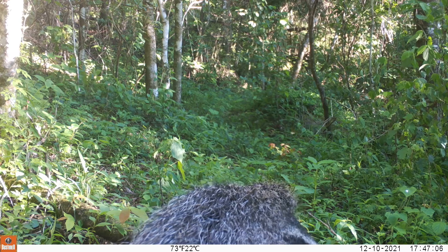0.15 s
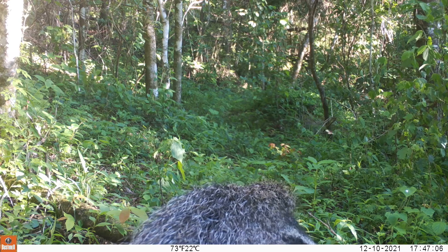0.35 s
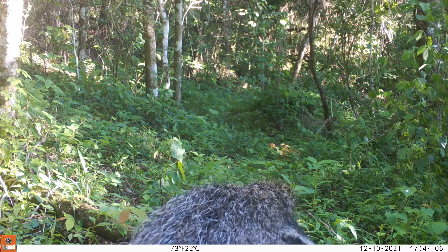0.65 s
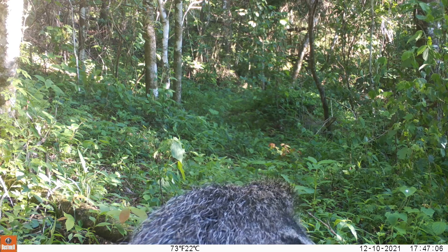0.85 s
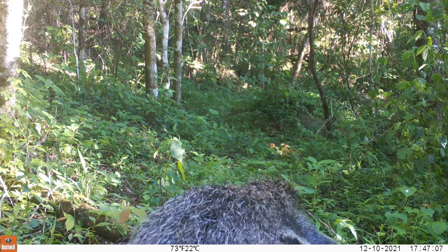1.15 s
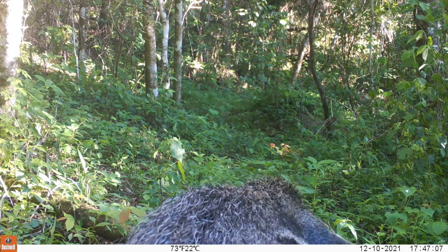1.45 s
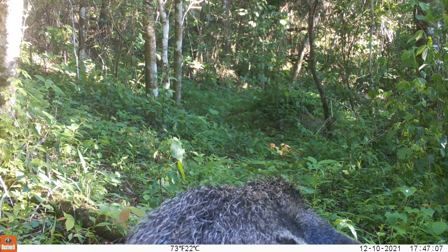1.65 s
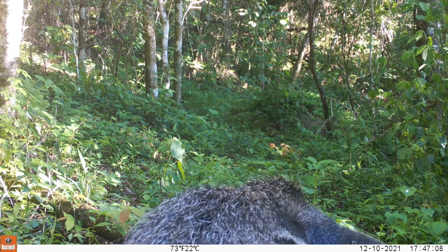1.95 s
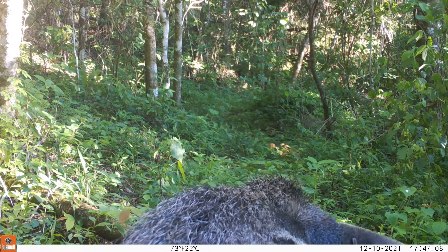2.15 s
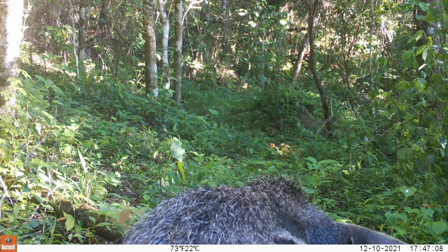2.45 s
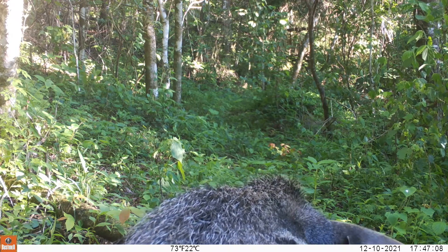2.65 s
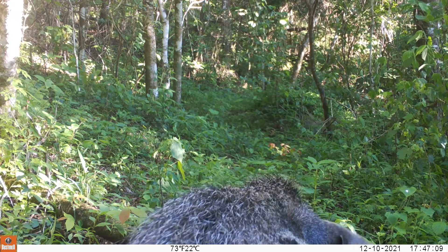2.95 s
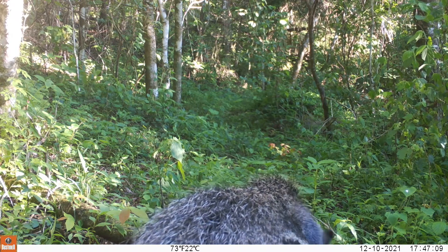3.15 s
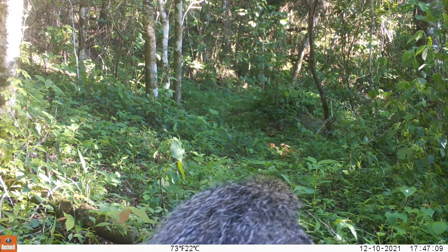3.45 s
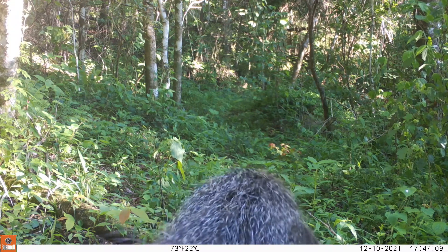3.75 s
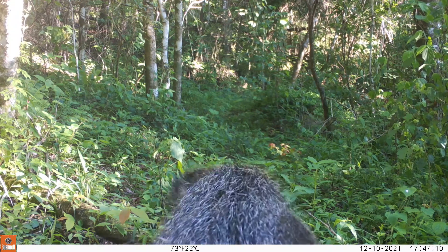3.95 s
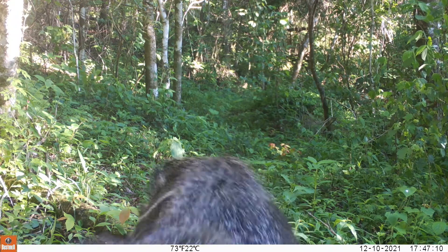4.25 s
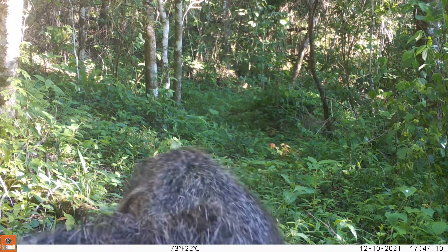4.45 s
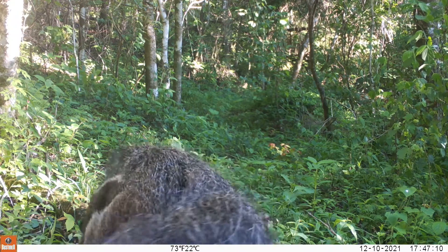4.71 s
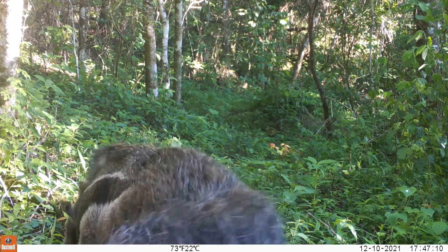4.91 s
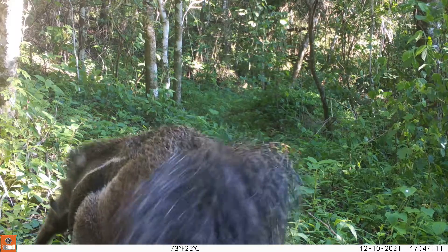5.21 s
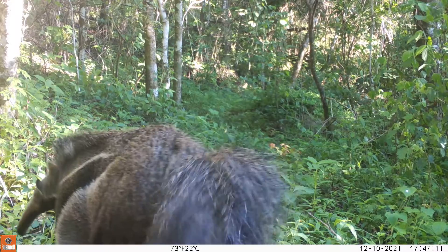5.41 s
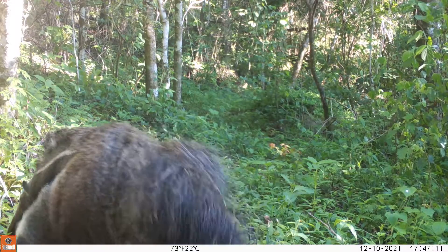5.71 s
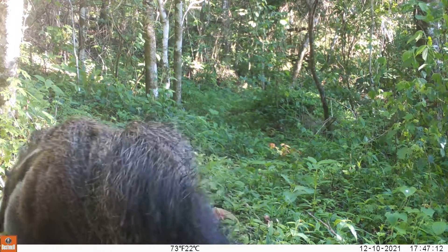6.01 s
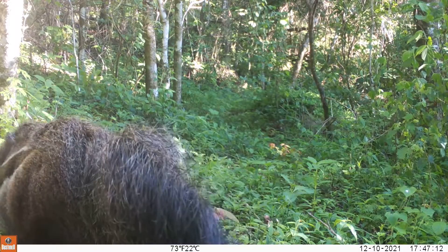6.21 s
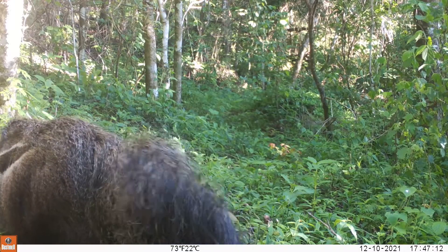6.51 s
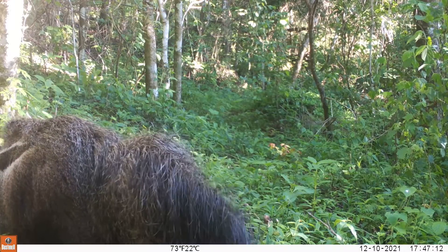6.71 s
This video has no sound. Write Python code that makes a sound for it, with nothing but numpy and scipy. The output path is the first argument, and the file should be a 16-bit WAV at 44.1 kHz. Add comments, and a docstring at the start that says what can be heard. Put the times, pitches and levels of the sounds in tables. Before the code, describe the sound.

Crickets trill throughout in a high, gently swelling whine over soft forest air, faint microphone hiss and a very low hum. A bird gives four short, rising, buzzy chirps with a little echo, at about 0.5, 2.2, 4 and 5.8 seconds. Distant birds whistle faintly now and then, and one gives a brief, quiet rasp at 1 second. A few light twig ticks dot the first three seconds. From about 3.2 seconds an animal pushes through the undergrowth close to the microphone: leaves slide and swish softly along its coarse coat and stems drag, while far insects grow slightly louder. Twigs snap around 3.8 and 4.2 seconds, and the loudest, sharpest crack comes at about 5.3 seconds. More crisp snaps follow in quick, uneven succession until about 6.6 seconds, and the rustling eases near 7 seconds as the crickets carry on.

```python
"""A forest by day, heard through a trail camera's one microphone. From the start, crickets trill
with their wings over soft air, hiss and hum, and now and then a twig ticks. At half a second a bird
sings the first of four rising, buzzy chirps. Far birds whistle faintly, and one rasps at 1 second.
From about 3 seconds a shaggy animal pushes through the undergrowth close by: leaves brush its
coat, stems drag and twigs snap, the loudest just after 5 seconds."""
import sys
import numpy as np
from scipy import signal
from scipy.fft import rfft, irfft
from scipy.io import wavfile

SR = 44100
rng = np.random.default_rng(int(sys.argv[2]) if len(sys.argv) > 2 else 0)


def transcribe(signal):
    """Save signal, clipped to [-1, 1], as a 16-bit WAV file at the path in sys.argv[1]."""
    frames = np.atleast_2d(signal).T
    limited = np.clip(frames, -1, 1)
    pcm = np.round(limited * 32767).astype(np.int16)
    wavfile.write(sys.argv[1], SR, pcm)


N = 302967
TIME = np.arange(N) / SR

# The tone of still air and of the microphone's hiss. Each row: frequency in Hz, relative level in dB.
AIR_SPECTRUM = [(20, 1), (60, -1.5), (100, -1.5), (250, -7.5), (450, -10), (1000, -14.5), (1300, -17),
                (2000, -20.5), (2700, -22), (3300, -19.5), (4000, -19.5), (4900, -13.5), (6300, -14),
                (9000, -60)]
HISS_SPECTRUM = [(3800, -23), (6400, -4), (7000, -3.5), (8400, -7.5), (10400, -5), (11800, -12),
                 (16000, -14)]
# The camera hums at its frame rate and multiples of it. Each row: frequency in Hz, level in dB.
HUM_TONES = [(30, -90), (60, -84), (90, -80.5), (180, -86.5)]
# The crickets in the chorus. Each row: pitch in Hz, wing strokes per second, pitch fall within a
# stroke in Hz, level within the chorus in dB, share of echo from 0 to 1.
CHORUS_CRICKETS = [(5438, 34.2, 404, -4, 0.78), (5628, 37, 301, -.5, 0.88), (5762, 52, 386, -5.5, 0.8),
                   (5930, 44, 444, -12, 0.9)]
# How strongly the chorus sings. Each row: time in seconds, level in dB.
CHORUS_LEVELS = [(0.0, -58), (0.36, -56), (0.69, -58.5), (0.94, -56.5), (1.26, -60), (1.91, -56),
                 (2.87, -60), (3.73, -56.5), (4.55, -60), (5.15, -56.5), (5.59, -61), (5.85, -59),
                 (6.52, -55.5), (6.87, -58)]
# The tone of the far insects. Each row: frequency in Hz, relative level in dB.
FAR_INSECT_SPECTRUM = [(2500, -52), (2850, -9), (3150, -4.5), (3480, -3.5), (3800, -7.5), (4400, -43)]
# How the far insects swell. Each row: time in seconds, level in dB.
FAR_INSECT_LEVELS = [(0, -83), (2.2, -79), (2.9, -77), (5.2, -72.5), (5.7, -71.5), (6.87, -73)]
# The two near crickets. Each row: pitch in Hz, wing strokes per second, pitch fall within a stroke
# in Hz, share of echo from 0 to 1.
NEAR_CRICKETS = [(5232, 33.7, 50, 0.17), (5437, 34.2, 87, 0.28)]
# When they sing. Each row: which cricket (0 or 1), start in seconds, level in dB.
CRICKET_PHRASES = [(0, .82, -61), (0, 2.67, -61.5), (0, 4.45, -61.5), (1, .24, -60.5), (1, 1.74, -61),
                   (1, 3.2, -58.5), (1, 4.58, -56.5), (1, 6.0, -57)]
# Snapping twigs and ticking leaves. Each row: start in seconds, level in dB, added brightness in dB
# per octave, decay time in seconds.
TWIG_SNAPS = [(.2865, -54, -2, 0.00091), (1.430, -62, -2.5, .001), (1.498, -47, -6, 0.0014),
              (1.897, -59, 4, .002), (1.933, -55, 1, .001), (2.572, -45, -2.5, 0.0015),
              (3.748, -49, 2, .002), (3.813, -42.5, -0.5, 0.0024), (3.885, -50, 7, 0.0018),
              (4.1945, -39, 3, .0005), (5.2509, -20, 0.5, 0.00079), (5.2598, -32.5, 1, 0.0025),
              (5.438, -38, -6, 0.0021), (5.458, -41, -5, 0.0011), (5.572, -31.5, -2.5, 0.0018),
              (5.6062, -36.5, -2.5, 0.001), (5.9847, -35.5, 1, 0.00076), (6.024, -45, -5, 0.0016),
              (6.055, -32.5, 7, 0.0019), (6.125, -25, 4.5, 0.00096), (6.2837, -44.5, -2.5, 0.00068),
              (6.3724, -30, -2.5, 0.00057), (6.387, -58, -5, 0.0011), (6.437, -44.5, 4, 0.0027),
              (6.525, -33, 0, 0.00078), (6.597, -46.5, -4, 0.0043), (6.607, -43.5, -1.5, 0.003)]
# The tone of a snap. Each row: frequency in Hz, relative level in dB.
TWIG_SPECTRUM = [(200, -22.5), (900, -20), (1900, -29.5), (2600, -15), (3600, -6), (4600, -9.5),
                 (6000, -0.5), (7500, 2.5), (10000, -6), (11500, -6), (12800, -17), (15000, -19)]
# The near bird's chirps. Each row: start and length in seconds, first and last pitch in Hz, seconds
# to the peak, peak level in dB, swell shape (1 is even, more is sooner), pulses per second,
# relative level of the overtone an octave up in dB.
BIRD_CHIRPS = [(.483, .222, 3623, 4530, 0.16, -42, 1.6, 150.8, -25),
               (2.247, 0.21, 3280, 4830, 0.16, -40, 2, 145.8, -34.5),
               (3.952, .2, 3674, 4540, 0.17, -36.5, 1.22, 136.9, -33),
               (5.818, 0.21, 3383, 4793, 0.19, -41, 3.2, 156.2, -40)]
# Far whistles and hoots. Each row: start and length in seconds, first, middle and last pitch in Hz,
# level in dB.
FAR_WHISTLES = [(0.71, 0.037, 1020, 1040, 1007, -75), (1.335, 0.037, 1050, 1030, 920, -74.5),
                (1.962, 0.14, 3730, 4110, 4070, -75), (2.72, .04, 4500, 4080, 3760, -73),
                (2.975, .08, 4950, 4090, 3780, -73), (3.05, .09, 3750, 3410, 3020, -79),
                (3.368, 0.038, 4200, 4000, 3900, -69), (6.62, 0.25, 545, 526, 505, -79.5)]
# The course of one scolding rasp. Each row: time in seconds, pitch in Hz, level in dB.
RASP_COURSE = [(1.005, 1080, -60), (1.029, 1171, -61.5), (1.081, 1204, -61), (1.119, 1112, -62.5),
               (1.156, 1043, -59.5), (1.18, 970, -72)]
# How the bird's throat shapes the rasp. Each row: frequency in Hz, relative level in dB.
THROAT_SPECTRUM = [(1100, -36), (2200, -7), (3500, -1), (4600, 2.5), (6900, -0.5), (8000, -16),
                   (10500, -18)]
# The tone of brushing leaves and of dragging stems. Each row: frequency in Hz, relative level in dB.
LEAF_SPECTRUM = [(500, -29), (2400, -21.5), (3600, -9), (5000, -2), (6400, -4), (7400, -1), (8400, -3.5),
                 (10000, -9), (11500, -13.5), (13000, -19.5), (15000, -23), (16000, -28)]
STEM_SPECTRUM = [(60, 12), (150, 5), (450, 2), (750, 1.5), (1200, 2), (1900, -2), (2600, -3), (3500, -1),
                 (7000, 7), (10000, -26), (15000, -21)]
# Leaves sliding steadily along the animal's coat. Each row: time in seconds, level in dB.
SLIDING_LEVELS = [(3.2, -84), (3.26, -66), (4.45, -62), (4.58, -68.5), (4.75, -63.5), (5.28, -59.5),
                  (5.53, -66.5), (6.33, -68), (6.62, -67), (6.87, -77.5)]
# Sprays of leaves swishing past, and stems and litter pressed down by the body and feet.
# Each row: middle in seconds, length in seconds, level in dB.
LEAF_SWISHES = [(3.735, 0.11, -58), (3.89, .1, -59), (4.18, 0.085, -57.5), (4.82, 0.054, -58.5),
                (5.03, .06, -59.5), (5.185, 0.098, -58.5), (5.44, 0.09, -57), (5.6, 0.083, -57),
                (6.02, 0.15, -59.5), (6.43, 0.094, -63), (6.53, 0.086, -60)]
STEM_TREADS = [(3.5, 0.79, -71), (4.18, 0.07, -72), (5.185, .06, -68), (5.6, 0.061, -80), (6.04, 0.11, -75),
               (6.127, .02, -65), (6.42, 0.25, -74.5), (6.59, .1, -74)]


def gain_of(db):
    """Turns decibels into a number to multiply a sound by."""
    return 10 ** (np.asarray(db) / 20)


def gain_curve(rows):
    """Joins rows of time and level into a gain for every sample."""
    return gain_of(np.interp(TIME, *np.transpose(rows)))


def unit_rms(x):
    """Scales a sound so that its average strength (rms) is 1."""
    return x / np.sqrt(np.mean(x ** 2) + 1e-20)


def level_at(spectrum, hz):
    """Looks up a spectrum's level in dB, on a log-frequency axis."""
    row_hz, row_db = np.transpose(spectrum)
    return np.interp(np.log(hz + 1), np.log(row_hz + 1), row_db)


def add(mix, start, sound):
    """Mixes a sound in at a start time in seconds."""
    part = mix[round(start * SR):][:len(sound)]
    part += sound[:len(part)]


def colour(x, spectrum):
    """Gives a sound the tone of a spectrum."""
    hz = np.fft.rfftfreq(len(x), 1 / SR)
    return irfft(rfft(x) * gain_of(level_at(spectrum, hz)), len(x))


def unit_band(x, low_hz, high_hz):
    """Scales a sound so that the part between two frequencies has strength 1."""
    hz = np.fft.rfftfreq(len(x), 1 / SR)
    return x / np.std(irfft(rfft(x) * ((hz > low_hz) & (hz < high_hz)), len(x)))


def drift(t, per_s):
    """A random wobble of about size 1 that turns per_s times a second."""
    knots = rng.standard_normal(4096)
    return np.interp((t - t[0]) * per_s, np.arange(len(knots)), knots)


def tree_echoes(x, fade_s, build_s):
    """Trunks and leaves scatter echoes that build up, then fall by 60 dB in fade_s."""
    t = np.arange(SR) / SR
    reflections = rng.standard_normal(SR) * (rng.random(SR) < .08)
    tail = reflections * gain_of(-60 * t / fade_s) * (1 - np.exp(-t / build_s))
    return signal.fftconvolve(x, tail / np.linalg.norm(tail))[:N]


def background(air_db=-68, hiss_db=-73.5):
    """Still forest air, the microphone's hiss and a faint hum from the camera."""
    air = unit_band(colour(rng.standard_normal(N), AIR_SPECTRUM), 20, 2800)
    hiss = unit_rms(colour(rng.standard_normal(N), HISS_SPECTRUM))
    hum = sum(gain_of(db) * np.sin(2 * np.pi * (hz * TIME + rng.random())) for hz, db in HUM_TONES)
    return gain_of(air_db) * air + gain_of(hiss_db) * hiss + np.sqrt(2) * hum


def trill(hz, rate, fall_hz, echo_share, wander_hz=16, scrape_hz=60):
    """Each wing stroke is a short tone that falls in pitch; the trees smear the trill into a whine."""
    stroke = np.cumsum(rate * (1 + .012 * drift(TIME, 5))) / SR % 1  # runs from 0 to 1 in each stroke
    pitch = hz - fall_hz * (stroke - .5) + wander_hz * drift(TIME, 7) + scrape_hz * drift(TIME, 600)
    direct = unit_rms(np.sin(np.pi * stroke) ** 2 * np.sin(2 * np.pi * np.cumsum(pitch) / SR))
    echoes = unit_rms(tree_echoes(direct, fade_s=.45, build_s=.003))
    return np.sqrt(1 - echo_share) * direct + np.sqrt(echo_share) * echoes


def cricket_chorus():
    """The farther crickets trill without a break, swelling and sinking together."""
    chorus = sum(gain_of(db) * trill(hz, rate, fall_hz, echo_share)
                 for hz, rate, fall_hz, db, echo_share in CHORUS_CRICKETS)
    return chorus * gain_curve(CHORUS_LEVELS)


def far_insects():
    """So many far trills overlap that only a soft band of sound is left."""
    return unit_rms(colour(rng.standard_normal(N), FAR_INSECT_SPECTRUM)) * gain_curve(FAR_INSECT_LEVELS)


def near_crickets(phrase_s=.95, edge_s=.059, soft_db=-8, soft_s=.27, swell_s=.25, hz_per_db=10):
    """Two crickets repeat phrases that open softly, then swell; softer strokes sound a little lower."""
    out = np.zeros(N)
    t = np.arange(0, phrase_s, 1 / SR)
    effort_db = soft_db * (1 - np.clip((t - soft_s) / swell_s, 0, 1))
    fades = np.minimum(np.minimum(t, phrase_s - t) / edge_s, 1)
    for cricket, (hz, rate, fall_hz, echo_share) in enumerate(NEAR_CRICKETS):
        gain, bend_hz = np.zeros(N), np.zeros(N)
        for singer, start, db in CRICKET_PHRASES:
            if singer == cricket:
                add(gain, start, fades * gain_of(db + effort_db))
                add(bend_hz, start, hz_per_db * effort_db)
        out += gain * trill(hz + bend_hz, rate, fall_hz, echo_share, wander_hz=7.06, scrape_hz=29.9)
    return out


def twigs(echo_db=-12):
    """Each snap is a millisecond or so of tearing fibres, with a short scatter from the leaves."""
    out, t = np.zeros(N), np.arange(2048) / SR
    hz = np.fft.rfftfreq(len(t), 1 / SR)
    lead = len(t) // 8  # room for the filter to ring ahead of the snap
    for start, db, brightness, decay_s in TWIG_SNAPS:
        tone_db = level_at(TWIG_SPECTRUM, hz) + brightness * np.log2(np.maximum(hz, 2000) / 7500)
        fibres = np.sign(rng.standard_normal(len(t))) * np.exp(-t / decay_s)
        snap = irfft(rfft(np.roll(fibres, lead)) * gain_of(tone_db))
        add(out, start - t[lead], gain_of(db) * np.std(fibres) * unit_rms(snap))
    return out + gain_of(echo_db) * tree_echoes(out, fade_s=.098, build_s=.002)


def chirping_bird(swell_db=25, fade_db_per_s=140, buzz_depth=.74, ease_s=.043, swing_hz=70, rasp_hz=160):
    """A rising whistle, chopped about 150 times a second; it starts hoarse and eases into a clear note."""
    out = np.zeros(N)
    for start, length, first_hz, last_hz, peak_s, peak_db, shape, rate, octave_db in BIRD_CHIRPS:
        t = np.arange(0, length, 1 / SR)
        hz = first_hz + (last_hz - first_hz) * np.minimum(t / (.9 * length), 1)  # climbs, then holds
        db = peak_db - swell_db * np.maximum(1 - t / peak_s, 0) ** shape
        db -= fade_db_per_s * np.maximum(t - peak_s, 0)
        depth = buzz_depth * np.minimum((length - t) / ease_s, 1)
        buzz = 2 * np.pi * np.cumsum(rate * (1 + .039 * drift(t, 91))) / SR
        unsteady_hz = rasp_hz * (1 - np.cos(buzz) / 2) * drift(t, 1100)  # widest between pulses
        hz += depth * (swing_hz * np.sin(buzz) + unsteady_hz)
        whistle = np.exp(2j * np.pi * np.cumsum(hz) / SR)
        # Hoarseness is an irregular vibration centred 260 Hz above the note.
        flutter = (drift(t, 1500) + 1j * drift(t, 1500)) * np.exp(2j * np.pi * 260 * t)
        hoarse_db = -2.5 - 22 * t / length
        voice = whistle * (1 + gain_of(hoarse_db) * flutter)
        overtones = gain_of(octave_db) * voice ** 2 + gain_of(octave_db - 13) * voice * whistle ** 2
        tone = np.sqrt(2) * (voice + overtones).real
        pulses = (1 + depth * np.cos(buzz)) / np.sqrt(1 + depth ** 2 / 2)
        add(out, start, gain_of(db) * tone * pulses * signal.windows.tukey(len(t), .06))
    return out + gain_of(-2.5) * tree_echoes(out, fade_s=.53, build_s=.001)


def far_birds():
    """Soft pure glides from deeper in the forest, half lost in their echoes."""
    out = np.zeros(N)
    for start, length, first_hz, middle_hz, last_hz, db in FAR_WHISTLES:
        progress = np.linspace(0, 1, int(length * SR))
        hz = np.interp(progress, [0, .5, 1], [first_hz, middle_hz, last_hz])
        whistle = np.sin(2 * np.pi * np.cumsum(hz) / SR) * signal.windows.tukey(len(hz), .5)
        add(out, start, gain_of(db) * unit_rms(whistle))
    return out + tree_echoes(out, fade_s=.38, build_s=.0023)


def scolding_bird(shakes_per_s=68, shake_depth=.078, roughness=.0555):
    """A harsh stack of overtones whose pitch shakes quickly."""
    times, pitches, levels = np.transpose(RASP_COURSE)
    t = np.arange(times[0], times[-1], 1 / SR)
    hz, db = np.interp(t, times, pitches), np.interp(t, times, levels)
    hz *= 1 + shake_depth * np.sin(2 * np.pi * shakes_per_s * t) + roughness * drift(t, 496)
    phase = 2 * np.pi * np.cumsum(hz) / SR
    voice = sum(gain_of(level_at(THROAT_SPECTRUM, k * hz)) * np.sin(k * phase) for k in range(1, 10))
    out = np.zeros(N)
    add(out, times[0], gain_of(db) * unit_rms(voice) * signal.windows.tukey(len(t), .1))
    return out + gain_of(-.5) * tree_echoes(out, fade_s=.33, build_s=.0051)


def contact_power(rows):
    """The power of soft touches that each grow and fade like a bell curve."""
    return sum(gain_of(db) ** 2 * np.exp(-8 * ((TIME - middle) / length) ** 2)
               for middle, length, db in rows)


def undergrowth(crackles_per_s=450, spread_db=3.5, crackle_gain=.66, drag_db=-19):
    """Leaves scrape over coarse fur as a fizz with tiny crackles; stems drag softly beneath it."""
    crackles = rng.standard_normal(N) * gain_of(spread_db * np.minimum(rng.exponential(1, N), 4))
    crackles *= rng.random(N) < crackles_per_s / SR
    scrape = rng.standard_normal(N) + crackle_gain * unit_rms(crackles)
    fizz = unit_band(colour(scrape, LEAF_SPECTRUM), 6500, 12000)
    drag = unit_band(colour(rng.standard_normal(N), STEM_SPECTRUM), 600, 2600)
    catching = gain_of(1.4 * drift(TIME, 90))
    sliding = gain_curve(SLIDING_LEVELS)
    leaves = fizz * np.sqrt(sliding ** 2 + contact_power(LEAF_SWISHES)) * catching
    stems = drag * np.sqrt((gain_of(drag_db) * sliding) ** 2 + contact_power(STEM_TREADS))
    moving = TIME > SLIDING_LEVELS[0][0]
    return moving * (leaves + stems)


def scene():
    """Everything reaches one microphone, which feeds both channels."""
    mono = background() + cricket_chorus() + far_insects() + near_crickets() + twigs()
    mono += chirping_bird() + far_birds() + scolding_bird() + undergrowth()
    return np.array([mono, mono])


def record(dry):
    """The camera cuts off the treble above 16000 Hz."""
    lowpass = signal.firwin(401, 16000, window=("kaiser", 8), fs=SR)
    return signal.oaconvolve(dry, lowpass[None], "same")


dry = scene()
out = record(dry)
transcribe(out)
```